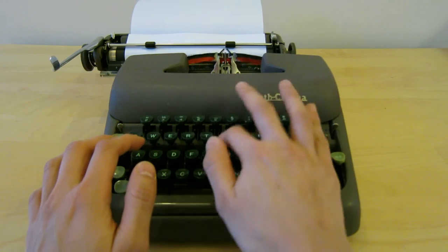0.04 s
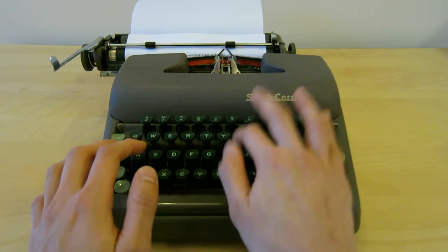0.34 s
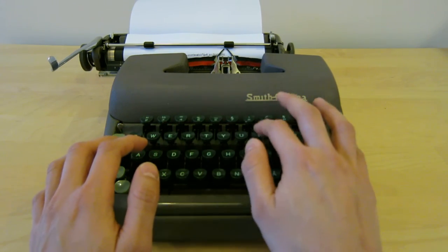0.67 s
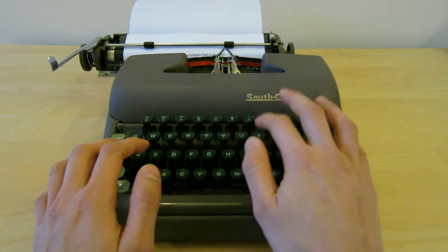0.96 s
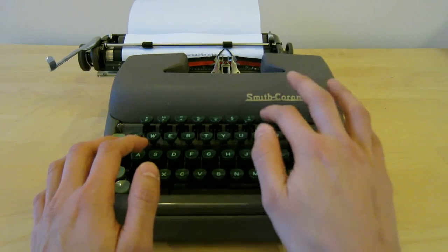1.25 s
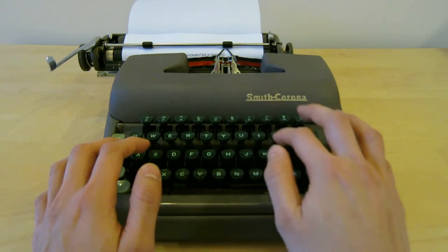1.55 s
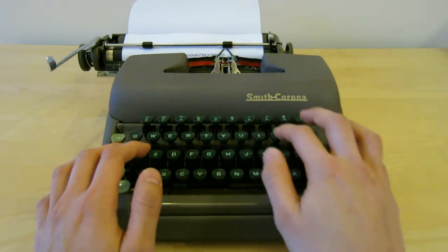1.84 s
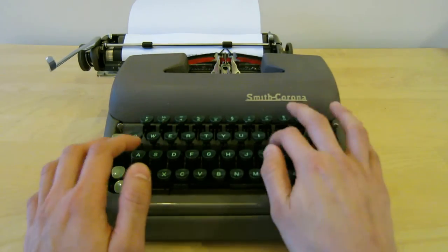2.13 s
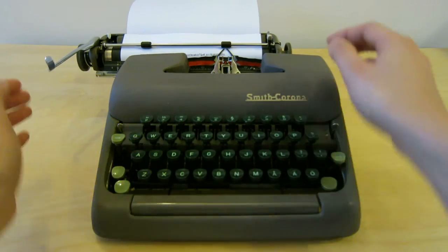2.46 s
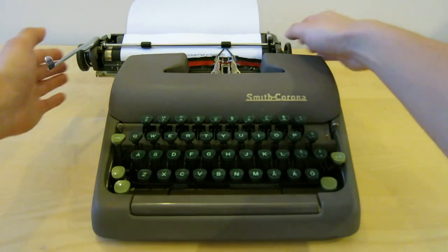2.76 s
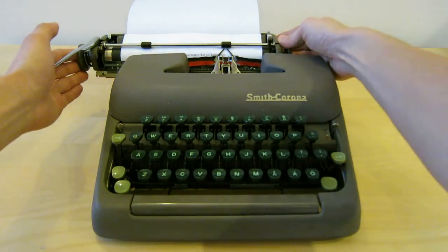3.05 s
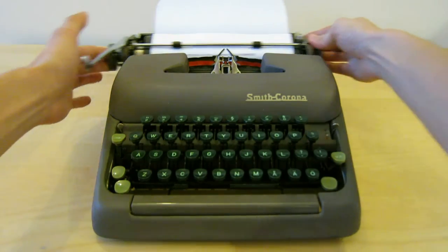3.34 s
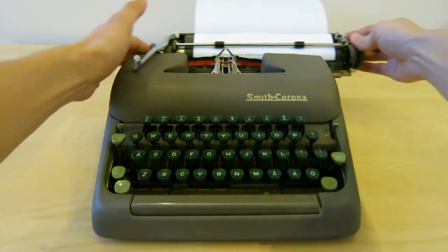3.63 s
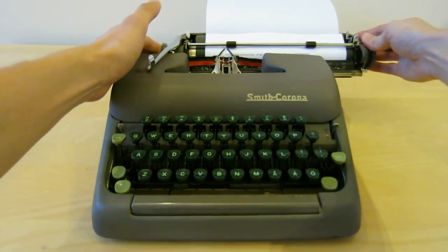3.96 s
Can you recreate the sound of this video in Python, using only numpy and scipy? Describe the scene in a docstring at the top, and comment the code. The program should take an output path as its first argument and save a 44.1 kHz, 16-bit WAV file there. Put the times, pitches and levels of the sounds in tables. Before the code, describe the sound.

A manual typewriter clacks four times, slowly, its small bell ringing on the third stroke. After a soft swish, a lever clicks and the carriage ratchets back to its stop, heard close up in a small quiet room.

```python
"""A manual typewriter on a wooden table in a small quiet room. In each of four keystrokes the levers
clatter, the escapement trips, the type strikes the platen, and the bar and key return; each impact
excites damped vibrations. The first is under way as the sound begins; the margin bell rings on the
third. After the fourth, the arms sweep past with a swish and puffs of air, the line lever clicks,
catches snap, and the carriage rolls over its ratchet, amid dull bumps, to the stop. A light tap follows."""
import sys
import numpy as np
from scipy import signal
from scipy.fft import rfft, irfft, next_fast_len
from scipy.io import wavfile
from scipy.ndimage import uniform_filter1d

SR = 44100
rng = np.random.default_rng(int(sys.argv[2]) if len(sys.argv) > 2 else 0)


def dump_mix(stems):
    """Bounce the given channels to the path in sys.argv[1] as a 16-bit WAV at rate SR."""
    frames = np.atleast_2d(stems).T  # one column per channel
    limited = np.clip(frames, -1, 1)  # hard clip at full scale
    pcm = np.round(limited * 32767).astype(np.int16)
    wavfile.write(sys.argv[1], SR, pcm)


N = 176400
LEAD = 8820  # samples computed before time zero
T = np.arange(-LEAD, N) / SR
FFT_SIZE = next_fast_len(len(T) + SR)
HZ = np.maximum(np.arange(FFT_SIZE // 2 + 1) * SR / FFT_SIZE, 1)

# Type impacts (time [s], level [dB], prior key travel [s], lever level [dB], fall-back delay [s])
KEYSTROKES = [(-.014, -11.5, 0.025, -28.5, 0.09), (0.3718, -10.5, .030, -28.5, 0.086),
              (1.0918, -9.5, .027, -25, .105), (2.1376, -10.5, .0325, -25.5, 0.098)]
# Rising keys (time [s], click level [dB], thud level [dB])
KEY_RETURNS = [(0.1278, -34, -48), (0.5144, -34.5, -48), (1.245, -35.5, -49.5), (2.2929, -34, -52)]
# Carriage catches (time [s], level [dB], T60 [s], tilt [dB/octave])
CATCH_SNAPS = [(3.078, -46, 0.048, -2.5), (3.184, -47, 0.11, -1), (3.214, -44.5, 0.13, -2),
               (3.2273, -21.5, 0.055, 2), (3.850, -32.5, 0.059, 1.5), (3.859, -28.5, 0.055, 0.6)]
# Pawl impacts on the ratchet (time [s], level [dB])
PAWL_TICKS = [(3.365, -43), (3.401, -52), (3.435, -42.5), (3.476, -47), (3.506, -49.5), (3.538, -47.5),
              (3.575, -48.5), (3.611, -53), (3.623, -53.5), (3.688, -44.5), (3.729, -52), (3.763, -52.5)]
# Friction along the rail (time [s], hiss level [dB], rumble level [dB])
RAIL_LEVELS = [(3.222, -98, -58), (3.26, -65, -59), (3.36, -57.5, -53.5), (3.44, -55.5, -52.5),
               (3.52, -67, -56.5), (3.65, -71.5, -61.5), (3.84, -74, -60), (3.9, -79, -58)]
# Line lever taps (time [s], level [dB], T60 [s], tilt [dB/octave], mode [Hz], mode level [dB])
LEVER_TAPS = [(2.9926, -29, 0.019, 3, 4240, -36.5), (3.971, -46.5, 0.033, -1.5, 2890, -45.5)]
# Four air puffs, then four handling bumps (time [s], relative level [dB], pitch [Hz], side re mid [dB])
LOW_THUMPS = [(2.808, -50.5, 65.4, 6), (2.844, -48, 123, 8), (2.897, -44, 79.6, 11), (2.966, -50.5, 87, 8),
              (3.095, -49, 90.6, -13.5), (3.289, -50.5, 99, -25), (3.407, -40, 78, -22),
              (3.466, -46.5, 110, -14)]
# Bell modes (frequency [Hz])
BELL_MODE_HZ = [4266, 4416, 11052, 11082, 10860]
# The same modes (level [dB], T60 [s], rise [s], left re right [dB], left phase lead [rad])
BELL_MODES = [(-35.5, 1.45, 0.055, 1, 0.11), (-34.5, 1.5, 0.029, -3.5, 0.48), (-23.5, 0.47, .001, 4, 2.3),
              (-30.5, 0.42, .001, 6, -0.69), (-33, .08, 0.00092, -0.5, 0.32)]
# Normal modes of the parts (frequency [Hz], relative level [dB], T60 [s])
PLATEN_MODES = [(1340, -21, .022), (1760, -17.5, 0.02), (4530, -2.5, 0.0021), (5500, -4.5, 0.0037),
                (7830, 3.5, 0.0044), (12200, -7, .003)]
LINKAGE_MODES = [(1823, -10.5, 0.48), (2850, -2, 0.23), (3468, -2.5, 0.44), (5200, -3, .3), (5350, -1, .35),
                 (6000, -1.5, .3), (6820, 4, .25), (7576, 1, .2), (8300, -4, .25), (8456, 1, 0.3),
                 (9500, -5, .25), (10640, -3.5, 0.18)]
CASE_MODES = [(65.6, -9, 0.71), (94.8, -17.5, .2), (178, -7.5, 0.63), (416.5, -5, 0.15), (228.7, 4.5, 0.36),
              (511.3, -1, 0.3), (605, -10, .25), (866, -6, .2)]
CARRIAGE_MODES = [(1345, -10, .08), (1995, 3, 0.044), (3320, -8, 0.13), (3877, 1.5, 0.085),
                  (5230, -2.5, 0.11), (6000, -8, 0.15), (8460, 5.5, 0.083), (9430, 6.5, 0.063),
                  (11250, 2, 0.076)]
# Spectral envelopes of the noises (frequency [Hz], relative spectral density [dB])
SLAP_SPECTRUM = [(60, -15.5), (300, -19.5), (900, -14.5), (1700, -8), (2800, -7.5), (4600, 1), (6000, 1.5),
                 (7800, 0.5), (10000, 0.5), (13500, -5), (16000, -24.5)]
LEVER_SPECTRUM = [(35, -42.5), (60, 0), (301, -6), (636, -2), (1170, -6.5), (1700, -5), (2770, -3),
                  (6430, -3), (11500, -4.5), (16000, -21.5)]
RETURN_SPECTRUM = [(35, -27), (60, -18.5), (566, -2.5), (968, -4.5), (1310, -10), (2840, -5.5), (3670, -7),
                   (5300, -8), (11500, -3), (16000, -30)]
KNOCK_SPECTRUM = [(100, -15), (220, 2.5), (350, -8.5), (520, 3), (900, -0.5), (1400, -14.5), (4000, -34),
                  (12000, -61.5)]
CATCH_SPECTRUM = [(59, -51), (100, -19), (1230, -4), (1450, -9), (2000, -7), (4770, -7.5), (8460, -3),
                  (11600, -5), (15000, -30)]
RATCHET_SPECTRUM = [(200, -28), (1500, -14), (3500, 0.5), (6000, 2.5), (9000, 4.5), (13000, -3),
                    (16000, -23)]
RUMBLE_SPECTRUM = [(40, -6), (100, 0.5), (230, -0.5), (340, -6.5), (800, -5), (1300, -17.5), (3000, -20),
                   (8000, -31.5)]
TAP_SPECTRUM = [(150, -12), (700, -5.5), (1700, -0.5), (2600, -6.5), (4200, 0), (5700, -12), (9300, -12),
                (15000, -48)]
SLEEVE_SPECTRUM = [(100, 16.5), (350, 5), (1200, 2.5), (6000, -4.5), (9500, -2), (11000, 0), (12500, -1.5),
                   (16000, -23)]
AIR_SPECTRUM = [(20, -18.5), (30, -5), (86, -2), (554, -8), (1860, -17), (9220, -31), (13300, -35.5),
                (16000, -45.5)]
# Stereo width of the direct and the reverberant sound (frequency [Hz], side gain [dB])
DIRECT_WIDTH = [(60, -19), (500, -21), (1500, -18.5), (5000, -14), (8000, -8.5), (14000, -3.5)]
REVERB_WIDTH = [(100, -16.5), (800, -19), (2000, -12), (7000, -4), (14000, 3)]
# Room reverberation (frequency [Hz], T60 [s], level re direct sound [dB])
ROOM_BANDS = [(80, 0.53, -3), (253, 0.45, -8.5), (800, 0.5, -4), (2550, 0.52, -6.5), (6100, 0.63, -13),
              (10110, 0.5, -14.5), (15000, 0.24, -21)]

BELL_S, STOP_S = 1.1335, 3.861
KNOCK_T60_S = 0.12


def keystrokes():
    """Impact excitation: levers drive the type onto the platen; platen, linkage and case ring freely."""
    slap = levers = body = 0
    for s, db, travel, lever_db, fall in KEYSTROKES:
        press = s - travel
        levers += burst(press - 0.0059, db=-49.5, t60=0.13, rise=0.00079)  # finger meets key
        levers += burst(press, lever_db, t60=0.11, rise=0.0043)
        body += ring(press, -49, CASE_MODES, rise=0.0033)
        slap += burst(s - 0.0042, db=-16, t60=0.016, rise=0.00038)  # escapement trips
        slap += burst(s, db - 2.5, t60=0.0045)  # type hits the paper
        slap += burst(s, db - 8, t60=0.03)  # frame shakes
        slap += burst(s, db - 12, t60=0.077)  # rattle
        body += ring(s, db - 0.5, PLATEN_MODES, rise=0.0001)
        body += ring(s, db - 41, LINKAGE_MODES)
        levers += burst(s, db=-33.5, t60=0.31)  # jangle
        levers += burst(s + fall, db=-38, t60=0.13, rise=0.002)  # bar drops back
    return colour(slap, SLAP_SPECTRUM) + colour(levers, LEVER_SPECTRUM) + body


def key_returns():
    """Transient response: each key comes up with a snap and a hollow knock, and the case resonates."""
    clicks = knocks = hum = 0
    for s, click_db, thud_db in KEY_RETURNS:
        clicks += burst(s, click_db, t60=0.091, rise=0.00087)
        clicks += burst(s, click_db + 4, t60=0.011)
        knocks += burst(s + 0.0041, thud_db + 2.5, KNOCK_T60_S, rise=0.0033)
        hum += ring(s + 0.003, thud_db, CASE_MODES, rise=0.0069)
    return colour(clicks, RETURN_SPECTRUM) + colour(knocks, KNOCK_SPECTRUM) + hum


def bell():
    """Beating: the split modes of a small steel bell interfere as they decay; left and right."""
    t = np.maximum(T - BELL_S, 0)
    side = np.array([[0.5], [-0.5]])
    tone = 0
    for hz, (db, t60, rise, pan_db, phase) in zip(BELL_MODE_HZ, BELL_MODES):
        envelope = amp(db + side * pan_db) * decay(t, t60, rise)
        tone += envelope * np.sin(2 * np.pi * hz * t + side * phase)
    return tone


def clapper():
    """Contact noise: the clapper's brief blow on the bell gives a broadband click."""
    return colour(burst(BELL_S, db=-30.5, t60=0.088, rise=0.00069), LEVER_SPECTRUM)


def catches():
    """Modal excitation: snapping catches ring the carriage, and its blow on the stop rings the case."""
    snaps = 0
    for s, db, t60, tilt in CATCH_SNAPS:
        snaps += colour(burst(s, db, t60, rise=0.00049), CATCH_SPECTRUM, tilt)
        snaps += ring(s, db - 17, CARRIAGE_MODES)
    stop = colour(burst(STOP_S, db=-40.5, t60=0.12, rise=0.0014), RUMBLE_SPECTRUM)
    return snaps + stop + ring(STOP_S, -55, CASE_MODES)


def line_lever():
    """Damped free vibration: the flicked lever clicks, rattles and rings briefly in one mode."""
    taps = 0
    for s, db, t60, tilt, hz, ring_db in LEVER_TAPS:
        click = burst(s, db, t60, rise=0.00021)
        rattle = burst(s, db - 15.5, t60=0.07)
        taps += colour(click + rattle, TAP_SPECTRUM, tilt) + ring(s, ring_db, [(hz, 0, 0.031)])
    return taps


def carriage_roll():
    """Friction noise: the carriage scrapes and rumbles along a rough rail under the ticking pawl."""
    times, hiss_db, rumble_db = np.array(RAIL_LEVELS).T
    hiss, rumble = (amp(np.interp(T, times, db, left=-np.inf)) * noise() for db in (hiss_db, rumble_db))
    roughness_db, roughness_s = 3, 0.007
    grip = uniform_filter1d(rng.standard_normal(len(T)), int(roughness_s * SR))
    scrape = hiss * amp(roughness_db * grip / grip.std())
    ticks = sum(burst(s, db, t60=0.04, rise=0.00098) for s, db in PAWL_TICKS)
    rolling = colour(ticks + scrape, RATCHET_SPECTRUM) + colour(rumble, RUMBLE_SPECTRUM)
    return rolling * mid_side(0, side_db=-5)


def low_thumps():
    """Slow pressure pulses sound low: puffs of air as the arms sweep past, then dull handling bumps."""
    thumps = 0
    t60, rise = 0.12, 0.0087
    for s, db, hz, side_db in LOW_THUMPS:
        t = np.maximum(T - s, 0)
        envelope = 2 * amp(-60 * t / t60) * (1 - np.exp(-(t / rise) ** 2))
        thumps += envelope * np.sin(2 * np.pi * hz * t) * mid_side(db, side_db)
    return thumps


def resting_finger():
    """Damped contact: a finger lands dully on a key without pressing it."""
    return colour(burst(s=0.935, db=-55.5, t60=KNOCK_T60_S, rise=0.002), KNOCK_SPECTRUM, tilt=3)


def sleeves():
    """Sliding friction: cloth noise swells and fades as the arms reach for the carriage."""
    peak_s, rise_s, fall_s = 2.872, 0.19, 0.14
    t = T - peak_s
    swell = np.exp(-(t / np.where(t < 0, rise_s, fall_s)) ** 2)
    return colour(noise() * swell, SLEEVE_SPECTRUM) * mid_side(-62.5, side_db=-9)


def reverberation(direct):
    """Diffuse field: convolution with noise that decays band by band, fastest in the top treble."""
    t = np.arange(SR) / SR
    hz, t60, db = np.array(ROOM_BANDS).T
    white = rfft(rng.standard_normal((2, SR)))
    log_hz = np.log(np.arange(SR // 2 + 1) + 1)
    tail = 0
    for k, share in enumerate(np.eye(len(hz))):
        band = irfft(white * np.interp(log_hz, np.log(hz), share), SR)
        envelope = decay(t, t60[k], rise=0.00087)
        tail += band * envelope * amp(db[k]) / np.sqrt(np.sum(envelope ** 2))
    return signal.fftconvolve(direct[None], tail, axes=1)[:, :len(T)]


def still_air():
    """Stationary noise: the faint, low background of the room."""
    return colour(noise(), AIR_SPECTRUM) * mid_side(-66, side_db=2)


def burst(s, db, t60, rise=0.0001):
    """Random superposition: dense, uneven contacts merge into noise that decays from time s."""
    t = np.arange(SR // 2) / SR
    envelope = decay(t, t60, rise)
    spread, contacts_per_s = 0.28, 1500
    strengths = np.exp(spread * rng.standard_normal(len(t)))
    contacts = np.repeat(strengths, SR // contacts_per_s)[:len(t)]
    chatter = rng.standard_normal((2, len(t))) * contacts * envelope
    chatter *= np.sqrt(np.sum(envelope ** 2) / np.sum(chatter ** 2, axis=1, keepdims=True))
    return place(amp(db) * chatter, s)


def ring(s, db, modes, rise=0.001):
    """Modal superposition: damped sinusoids start together at time s with random phases."""
    t = np.arange(SR * 2 // 3) / SR
    vibration = 0
    for hz, mode_db, t60 in modes:
        cycles = hz * t + rng.random((2, 1))
        vibration += amp(db + mode_db) * decay(t, t60, rise) * np.sin(2 * np.pi * cycles)
    return place(vibration, s)


def decay(t, t60, rise):
    """Exponential damping: 60 dB of fall in t60 seconds, with an onset time constant of rise seconds."""
    return amp(-60 * t / t60) * (1 - np.exp(-t / rise))


def colour(x, spectrum, tilt=0):
    """Minimum-phase filtering that preserves the power of white noise; tilt in dB per octave."""
    gain = gains(spectrum) * amp(tilt * np.log2(HZ))
    gain /= np.sqrt(np.mean(gain ** 2))
    cepstrum = irfft(np.log(gain), FFT_SIZE)
    cepstrum[1:FFT_SIZE // 2] *= 2  # folding onto positive time makes the filter causal
    cepstrum[FFT_SIZE // 2 + 1:] = 0
    return irfft(rfft(x, FFT_SIZE) * np.exp(rfft(cepstrum)), FFT_SIZE)[..., :len(T)]


def set_width(x, width):
    """Interchannel coherence: scaling the side signal sets the stereo width at each frequency."""
    mid, side = x
    return np.array([mid, irfft(rfft(side, FFT_SIZE) * gains(width), FFT_SIZE)[:len(T)]])


def gains(points):
    """Magnitude response: (frequency [Hz], level [dB]) points interpolated over log frequency."""
    hz, db = np.array(points, float).T
    return amp(np.interp(np.log(HZ), np.log(hz), db))


def amp(db):
    """The decibel law: level to amplitude ratio."""
    return 10 ** (np.asarray(db) / 20)


def mid_side(db, side_db):
    """Level difference: gains for mid at db and for side at side_db relative to it."""
    return amp([[db], [db + side_db]])


def noise():
    """Uncorrelated white noise for mid and side."""
    return rng.standard_normal((2, len(T)))


def place(x, s):
    """Time shift: a short sound begins at s seconds."""
    track = np.zeros((2, len(T)))
    start = max(int(s * SR) + LEAD, 0)
    track[:, start:start + x.shape[-1]] = x[..., :len(T) - start]
    return track


def scene():
    """Linear superposition: the close machine, its reverberation and the air sum to left and right."""
    impacts = keystrokes() + key_returns() + clapper() + catches() + line_lever() + resting_finger()
    machine = set_width(impacts, DIRECT_WIDTH) + carriage_roll()
    room = set_width(reverberation(machine[0]), REVERB_WIDTH)
    mid, side = machine + low_thumps() + sleeves() + room + still_air()
    return (np.array([mid + side, mid - side]) + bell())[:, LEAD:]


def record(dry):
    """Band limiting: filters remove the deepest bass and the highest treble."""
    low_hz, top_hz = 42, 15800
    high_pass = signal.butter(3, low_hz, "high", fs=SR, output="sos")
    low_pass = signal.ellip(10, 0.2, 70, top_hz, fs=SR, output="sos")
    return signal.sosfilt(low_pass, signal.sosfilt(high_pass, dry))


dry = scene()
out = record(dry)
dump_mix(out)
```